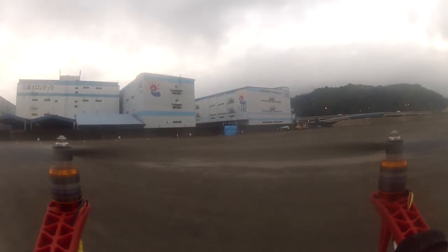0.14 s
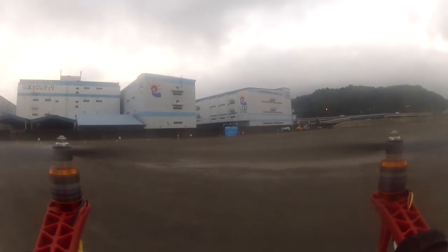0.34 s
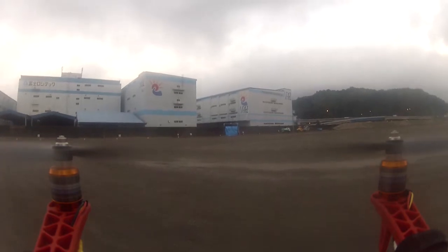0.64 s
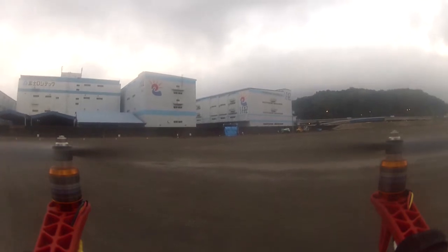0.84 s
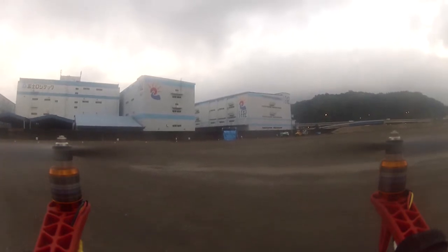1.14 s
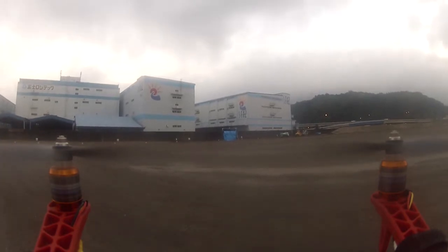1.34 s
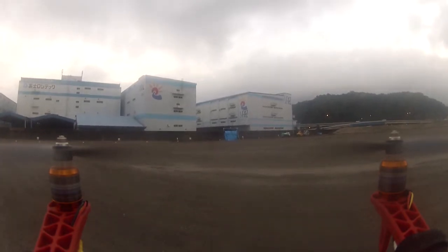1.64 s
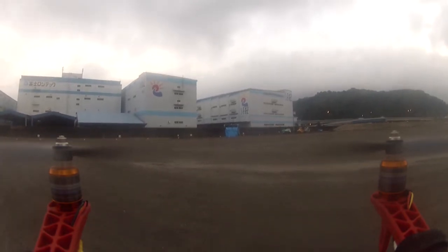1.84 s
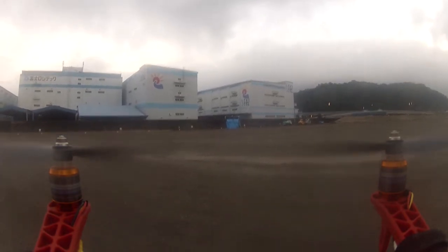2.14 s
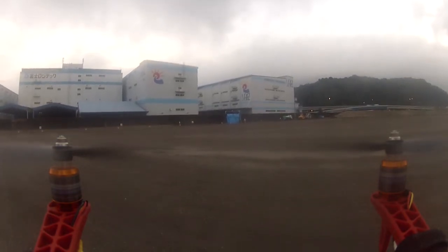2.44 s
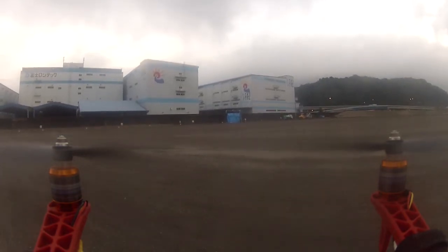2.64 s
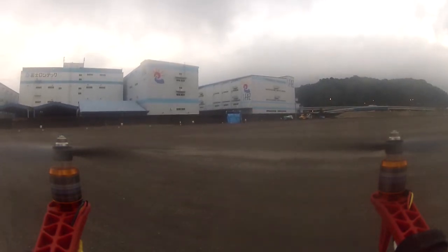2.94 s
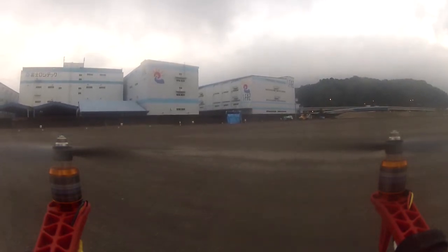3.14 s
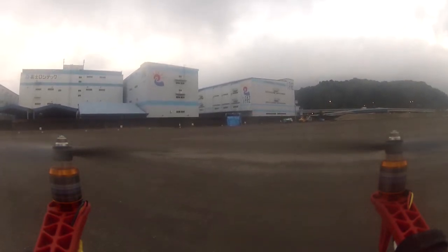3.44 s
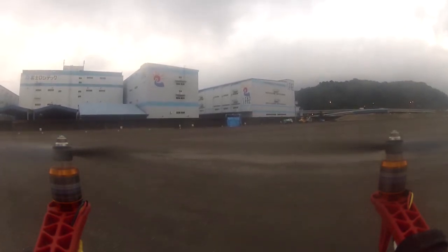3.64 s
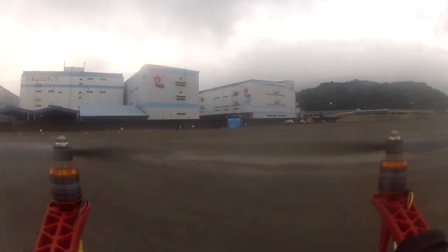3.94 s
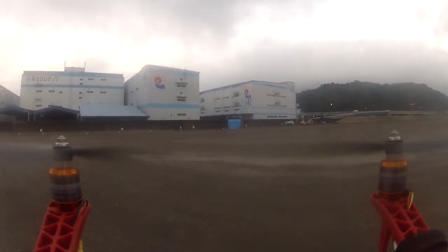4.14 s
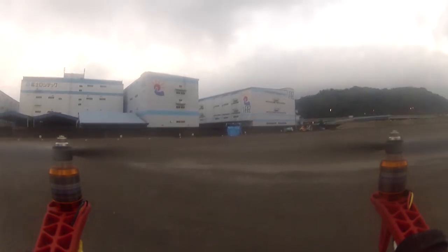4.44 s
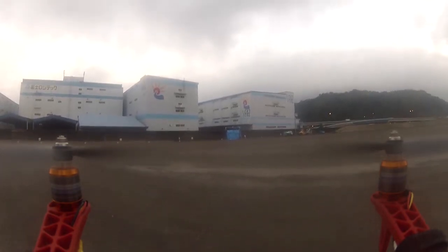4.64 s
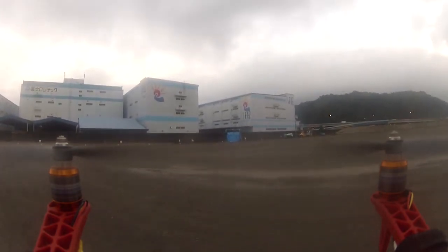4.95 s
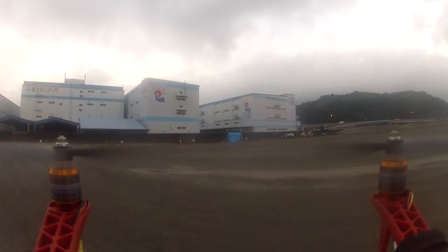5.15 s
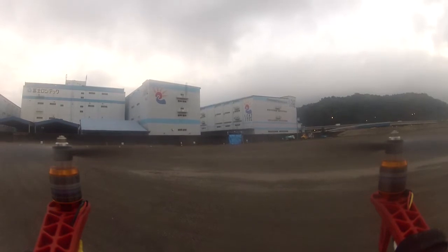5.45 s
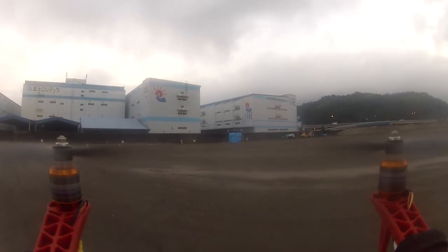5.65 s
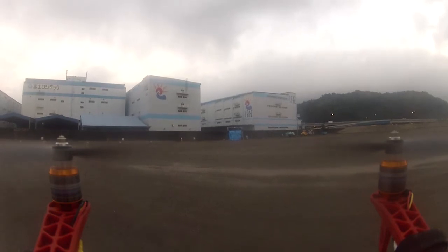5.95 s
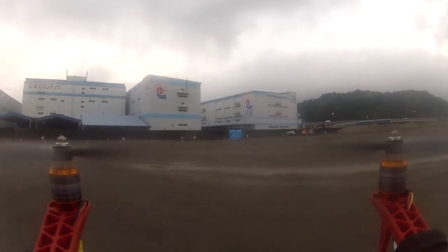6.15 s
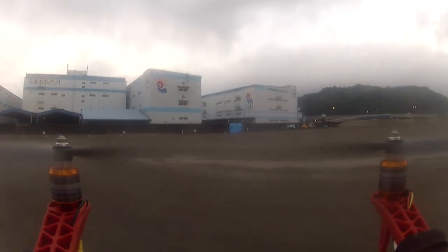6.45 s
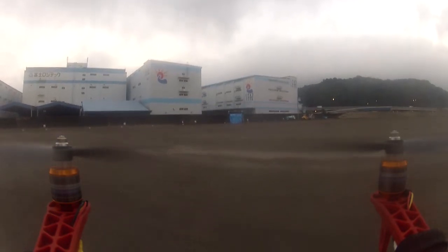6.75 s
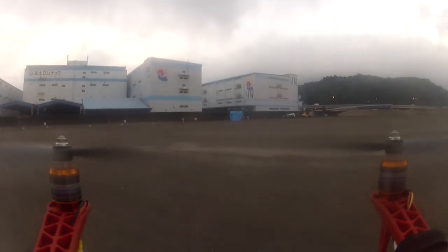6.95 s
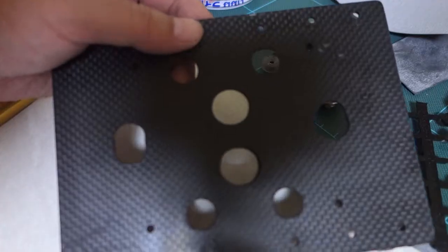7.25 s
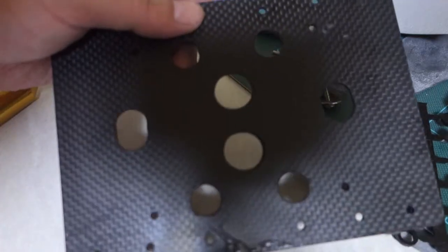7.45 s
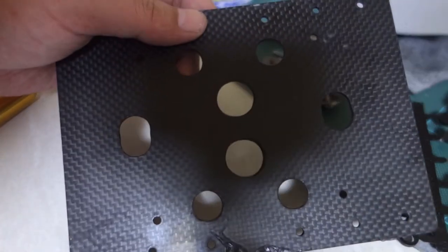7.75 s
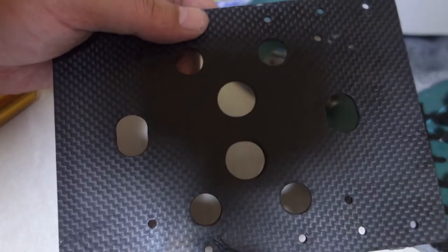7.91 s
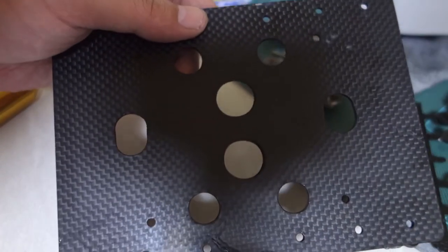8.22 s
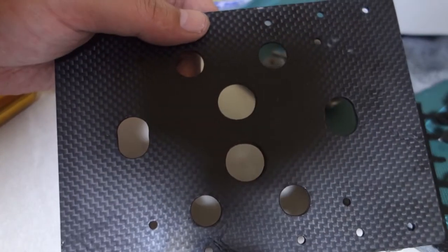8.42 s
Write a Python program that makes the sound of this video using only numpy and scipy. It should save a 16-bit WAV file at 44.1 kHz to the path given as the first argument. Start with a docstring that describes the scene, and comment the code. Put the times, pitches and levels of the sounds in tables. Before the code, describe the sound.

Heard from on board, the motors and propellers of a hovering drone make a loud, continuous buzz with rushing air and a bright, fluttering whine. The pitch wavers only slightly, and thin high tones fade in and out. About seven seconds in, the flight stops dead at a cut, and soft indoor room tone fades in: a low, fan-like wash of air with a faint hum and electrical whine.

```python
"""A six-rotor drone hovers, heard from a camera on its frame. Steered to slightly different speeds,
the rotors hum, beat and whine over the rush of their blades, while thin whines come and go. The camera
samples at a low rate and holds each sample, which mirrors the whine into the treble. Late in the flight
one motor sags, and the drone swells briefly. At about 7 s the scene cuts to a quiet workroom, where a
low fan-like rush and a faint electrical whine fade in."""
import sys
import numpy as np
from scipy import signal
from scipy.fft import rfft, irfft
from scipy.io import wavfile

SR = 44100
rng = np.random.default_rng(int(sys.argv[2]) if len(sys.argv) > 2 else 0)


def bounce(signal):
    """Save signal as a 16-bit WAV file at the path given by the first command-line argument."""
    frames = np.transpose(np.atleast_2d(signal))
    limited = np.clip(frames, -1, 1)
    pcm = np.round(limited * 32767).astype(np.int16)
    wavfile.write(sys.argv[1], SR, pcm)


N = 378378


def drone(buffet_db=0.84, buffets_per_s=40):
    """The rotors and the air they move; buffeting makes all the motor tones flutter together."""
    speeds = rotor_speeds()
    angles = [angle_of(speed) for speed in speeds]
    motors = sum(motor_tones(speed, partials) for speed, partials in zip(speeds, MOTOR_PARTIALS))
    buffeting = from_db(buffet_db * drift(buffets_per_s))
    return motors * buffeting + blade_buzz(angles) + blade_rush(angles) + thin_whines(speeds)


# the flight controller's moves: t/s, then throttle, yaw, roll, pitch as speed offsets/(turns/s)
FLIGHT_MOVES = [(0.0, -0.42, 0.67, -0.82, 1.1), (0.37, 0.31, 0.12, -1.27, 0.76),
                (0.58, 0.15, -0.27, -0.16, 1.88), (0.79, 0.83, 0.66, 0.17, 0.6),
                (1.1, -0.075, 1.91, 0.022, 0.42), (1.26, 0.09, 1.7, -0.1, 0.37),
                (1.98, -0.18, 0.11, 0.12, 0.12), (2.35, -0.049, -0.25, -0.059, -0.5),
                (2.8, -0.64, -0.67, 0.044, -0.059), (3.56, -0.46, -0.28, -0.22, 0.59),
                (3.98, 0.33, -0.38, -0.66, 0.82), (4.19, 0.41, -0.49, 0.18, 0.15),
                (4.7, 0.21, 0.79, -0.45, 0.57), (4.99, 0.13, 0.35, -0.0099, -0.14),
                (5.33, 0.095, -0.89, 0.097, -0.22), (5.9, 0.21, -0.37, 0.39, -1.06),
                (6.13, 0.38, -0.49, 0.06, -1.38), (7.05, 0.39, -0.69, 0.22, -1.46)]
# six rotors, slow and fast in turn round the frame: hover speed/(turns/s), spin sign, arm angle/deg
ROTOR_LAYOUT = [(88.1, 1, 120), (88.04, 1, 240), (96.42, -1, 180), (98.61, -1, 60), (98.65, -1, 300),
                (86.25, 1, 0)]
def rotor_speeds(hunt_turns_per_s=0.1202, hunts_per_s=11.87, sag_at_s=5.35, sag_takes_s=0.55):
    """Throttle drives all rotors; yaw pulls the two spin directions apart, roll and pitch opposite arms."""
    throttle, yaw, roll, pitch = in_time(FLIGHT_MOVES)
    speeds = []
    for hover, spin, arm in ROTOR_LAYOUT:
        tilt = np.sin(np.radians(arm)) * roll + np.cos(np.radians(arm)) * pitch
        hunting = hunt_turns_per_s * drift(hunts_per_s)  # each motor hunts round its set speed
        speeds.append(hover + throttle + spin * yaw + tilt + hunting)
    # the second motor sags by one turn per second and stays slow
    speeds[1] -= np.clip((np.arange(N) / SR - sag_at_s) / sag_takes_s, 0, 1)
    return speeds


# one list per rotor: order (multiple of its speed), relative level/dB
# unbalance and blades hum below order 10, the motor's magnets whine above
MOTOR_PARTIALS = [
    [(1, -39), (2, -58), (3, -34), (4, -83), (5, -64), (6, -47.5), (8, -61), (9, -59), (12, -53),
     (13, -42.5), (14, -35.5), (24, -56), (25, -43), (37, -56), (42, -29.5), (48, -72), (50, -60),
     (52, -68)],
    [(1, -46.5), (2, -59), (3, -48.5), (5, -60.5), (6, -56.5), (9, -63), (12, -61), (13, -35), (14, -37.5),
     (21, -55), (28, -39.5), (37, -56), (42, -39.5)],
    [(1, -43), (2, -59.5), (3, -37), (4, -74), (5, -53), (6, -53.5), (8, -55), (11, -58), (13, -35),
     (14, -29.5), (21, -41.5), (24, -38), (28, -40), (29, -53), (35, -45), (36, -52), (42, -50.5),
     (48, -59)],
    [(1, -52.5), (2, -57.5), (3, -91), (8, -58), (9, -66), (10, -52), (13, -23), (14, -34), (15, -41.5),
     (16, -40.5), (17, -33.5), (18, -39), (20, -52), (21, -58), (26, -36.5), (27, -36.5), (34, -50),
     (39, -46.5), (42, -54)],
    [(1, -58), (2.967, -56.5), (8, -59), (10.05, -56), (8.79, -68), (14, -25.5), (15, -54), (17, -43.5),
     (21.03, -63)],
    [(1, -56), (2, -63.5), (3, -61), (9, -64.5), (13, -54), (14, -40), (28, -35), (36, -46)],
]
# sharp arm resonances that swell any motor tone drifting into them: f/Hz, width/Hz, boost/dB
ARM_RESONANCES = [(284.55, 8.8, 7.5), (472.7, 18, 11), (627, 7.2, 9.5), (3978, 177, 15)]
def motor_tones(speed, partials, hum_flutter_db=1.3, whine_flutter_db=1.56, shake_rad=0.013, step=100):
    """Harmonics locked to one shaft; turbulence shakes it and flutters the high orders most."""
    shaft = angle_of(speed) + shake_rad * drift(26)
    samples, out = np.arange(N), np.zeros(N)
    for order, level_db in partials:
        flutter_db = np.interp(order, [3, 20], [hum_flutter_db, whine_flutter_db])
        ring_db = boost_db(order * speed[::step], ARM_RESONANCES)
        gain = from_db(level_db + ring_db + flutter_db * drift(10.1, step))
        out += np.interp(samples, samples[::step], gain) * tone(np.round(order) * shaft)
    return out


# tone curve of air torn by the blades: f/Hz, relative level/dB
BLADE_AIR_EQ = [(25, -24), (110, -17), (210, -11), (400, -23), (640, -20), (880, -18), (1030, -11),
                (1200, -7), (2200, 1), (2900, -10), (3300, -7), (3950, -10.5), (4250, -18), (5400, -12),
                (6000, -21)]
# resonances and one notch of frame and camera case: f/Hz, width/Hz, boost/dB
FRAME_RESONANCES = [(1300, 46, 9.5), (1680, 160, 8), (2560, 276, 13.5), (3757, 340, 13.5), (4600, 280, 2),
                    (4960, 150, -10.5)]
def blade_rush(angles, level_db=-26, chop=0.41, gust_db=1.2):
    """Each two-bladed propeller throws a puff of turbulence past the camera twice a turn."""
    puffs = sum(np.exp(2 * chop * np.cos(2 * angle + 2 * np.pi * rng.random())) for angle in angles)
    chopped_air = np.sqrt(puffs) * rng.standard_normal(N)
    return from_db(level_db + gust_db * drift(18)) * coloured(chopped_air, BLADE_AIR_EQ, FRAME_RESONANCES)


def blade_buzz(angles, level_db=-31, cycle_samples=2048, harmonic_count=58):
    """Part of the turbulence repeats with every turn: a dense comb of weak harmonics per rotor."""
    buzz = np.zeros(N)
    turn = np.arange(cycle_samples) * 2 * np.pi / cycle_samples
    for angle in angles:
        harmonics = np.exp(2j * np.pi * rng.random(harmonic_count))
        one_turn = irfft(np.r_[0, harmonics], cycle_samples)
        buzz += np.interp(angle % (2 * np.pi), turn, one_turn, period=2 * np.pi)
    return from_db(level_db) * coloured(buzz, BLADE_AIR_EQ, FRAME_RESONANCES)


# whine cues: hold from t/s, hold to t/s, rotor (from 0), multiple of its speed, relative level/dB
WHINE_CUES = [(0.28, 1.51, 5, 28, -31), (1.601, 2.1, 5, 28, -27.5), (2.25, 3.35, 5, 28, -32.5),
              (3.5, 4.1, 5, 28, -27.5), (4.25, 4.7, 5, 28, -32), (2.19, 3.1, 5, 30.55, -30),
              (5.5, 6.4, 5, 30.65, -34.5), (6.6, 7.06, 5, 30.72, -28.5), (5.4, 6.2, 2, 22.45, -36),
              (6.55, 7.06, 2, 23.2, -33)]
def thin_whines(speeds, trim_db=-0.7, flutter_db=2.6, fade_s=0.16):
    """Each fluttering whine fades in, holds and fades out, its pitch riding on one rotor's speed."""
    t, out = np.arange(N) / SR, np.zeros(N)
    for start, end, rotor, multiple, level_db in WHINE_CUES:
        fade = np.clip(np.minimum(t - start, end - t) / fade_s + 1, 0, 1)
        gain = from_db(level_db + trim_db + flutter_db * drift(7.1))
        out += fade * gain * tone(angle_of(multiple * speeds[rotor]))
    return out


def camera(x, rate_hz=12000, rolloff_hz=13000, top_hz=15280):
    """Sample and hold: the spectrum repeats, mirrored, around the camera's low sampling rate."""
    held = np.repeat(signal.resample_poly(x, rate_hz, SR), 4)
    mirrored = signal.resample_poly(held, SR, 4 * rate_hz)[:N]
    pole = np.exp(-2 * np.pi * rolloff_hz / SR)
    softened = signal.lfilter([1 - pole], [1, -pole], mirrored)
    return high_cut(softened, top_hz)


# tone curve of the workroom air: f/Hz, relative level/dB
ROOM_AIR_EQ = [(15, -49), (25, -20), (96, -8.5), (144, -15.5), (221, -5), (305, -7), (340, -7.5),
               (421, -11.5), (482, -13.5), (631, -13), (1270, -21.5), (5140, -42), (6050, -38), (8130, -45),
               (15500, -52)]
# broad humps and a dip in that air: f/Hz, width/Hz, boost/dB
ROOM_AIR_HUMPS = [(2000, 980, 4.5), (2850, 500, -1), (3620, 300, 2)]
# low hum: f/Hz, relative level/dB
HUM_TONES = [(91.5, -58), (172.3, -58), (215.3, -47.5), (242.2, -48.5), (786.0, -56)]
# faint electrical whine: f/Hz, level/dB
ELECTRICAL_TONES = [(4500, -79), (4646, -85), (5663, -85), (5809, -74), (5954, -77), (6099, -76),
                    (6245, -80), (6390, -91), (6826, -86), (6971, -86)]
def workroom(air_db=-42.6, hum_trim_db=-4.5, waver_rad=0.45):
    """Room tone: a soft, steady bed of air under wavering hum and electrical whine."""
    t = np.arange(N) / SR
    out = from_db(air_db) * coloured(rng.standard_normal(N), ROOM_AIR_EQ, ROOM_AIR_HUMPS)
    for tones, trim_db in (HUM_TONES, hum_trim_db), (ELECTRICAL_TONES, 0):
        for hz, level_db in tones:
            out += from_db(level_db + trim_db) * tone(2 * np.pi * hz * t + waver_rad * drift(2.9))
    return out


def from_db(db):
    """Decibels to gain."""
    return 10 ** (np.asarray(db) / 20)


def rms_one(x):
    """Scale to an rms of 1."""
    return x / np.sqrt(np.mean(x ** 2) + 1e-20)


def in_time(rows):
    """Turn timed breakpoints into one automation curve per column."""
    times, *columns = np.transpose(rows)
    return [np.interp(np.arange(N) / SR, times, column) for column in columns]


def drift(rate, step=1):
    """Smooth random modulation of rms 1, moving about `rate` times a second, at every `step`-th sample."""
    hop, settle = 40, 2000
    pole = np.exp(-2 * np.pi * hop * rate / SR)
    noise = rng.standard_normal(N // hop + settle + 2)
    slow = signal.lfilter([1], [1, -2 * pole, pole * pole], noise)[settle:]
    return np.interp(np.arange(0, N, step) / hop, np.arange(len(slow)), rms_one(slow))


def angle_of(hz):
    """Running angle of something that turns at hz."""
    return 2 * np.pi * np.cumsum(hz) / SR


def tone(angle):
    """A sine of rms 1 with a random start phase."""
    return np.sqrt(2) * np.sin(angle + 2 * np.pi * rng.random())


def boost_db(hz, resonances):
    """Boost or cut that a set of bell-shaped resonances gives each frequency."""
    return sum(boost / (1 + (2 * (hz - centre) / width) ** 2) for centre, width, boost in resonances)


def coloured(x, curve, resonances):
    """EQ a sound with a broad tone curve plus resonances; rms 1."""
    hz = np.maximum(np.arange(N // 2 + 1) * SR / N, 1)
    points, levels = np.transpose(curve)
    db = np.interp(np.log(hz), np.log(points), levels) + boost_db(hz, resonances)
    return rms_one(irfft(rfft(x) * from_db(db), N))


def high_cut(x, hz):
    """A very steep low-pass."""
    return signal.sosfilt(signal.ellip(14, 0.1, 80, hz, fs=SR, output="sos"), x)


def scene(cut_s=7.062, swell_at_s=6.9, swell_width_s=0.047, swell_db=1.2, fade_from_db=-15.5, fade_s=0.084):
    """The flight with its last brief swell, then a hard cut to the workroom, which fades in."""
    t = np.arange(N) / SR
    flight_db = 1 + swell_db * np.exp(-((t - swell_at_s) / swell_width_s) ** 2)
    flight = from_db(flight_db) * camera(drone())
    room_db = fade_from_db * np.exp(-np.maximum(t - cut_s, 0) / fade_s)
    room = from_db(room_db) * workroom()
    return np.where(t < cut_s, flight, room)[None]


def record(dry):
    """A steep high cut takes the very top off both scenes."""
    return high_cut(dry, hz=15700)


dry = scene()
out = record(dry)
bounce(out)
```